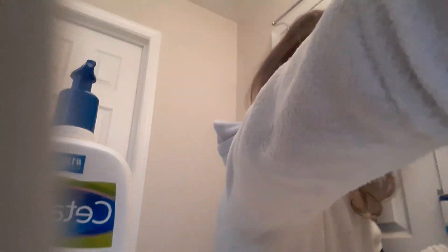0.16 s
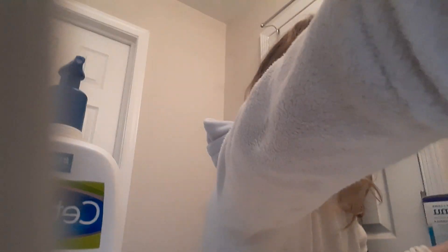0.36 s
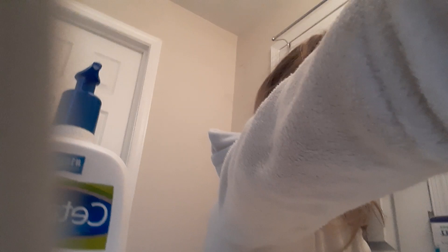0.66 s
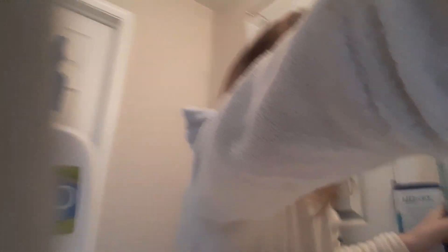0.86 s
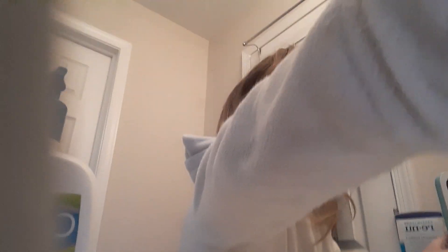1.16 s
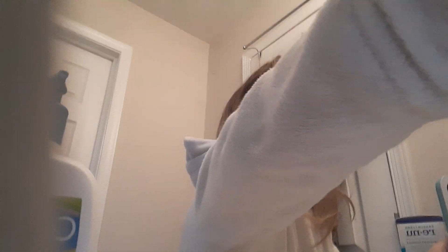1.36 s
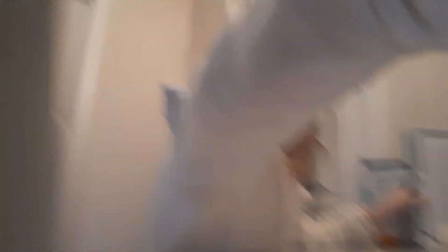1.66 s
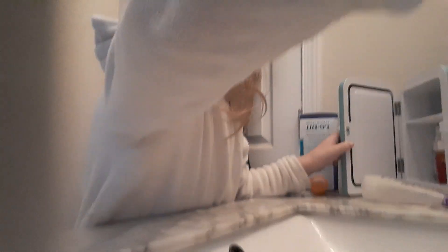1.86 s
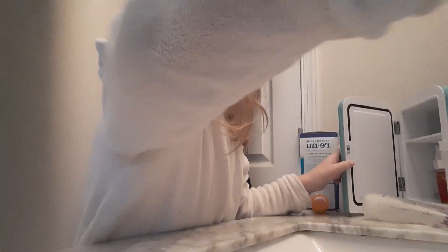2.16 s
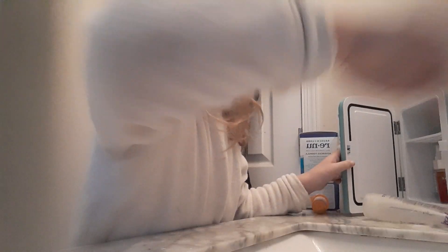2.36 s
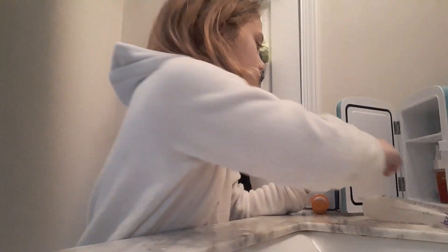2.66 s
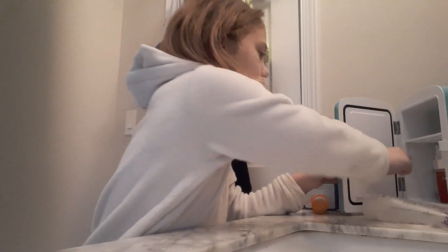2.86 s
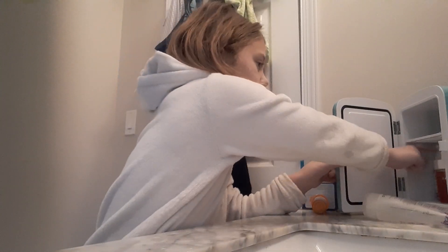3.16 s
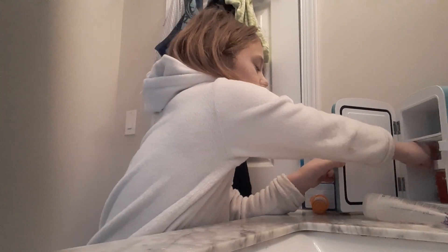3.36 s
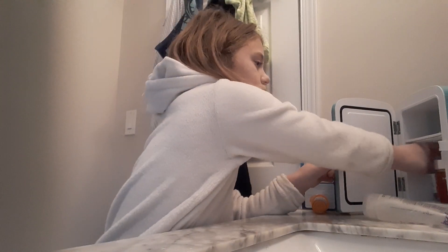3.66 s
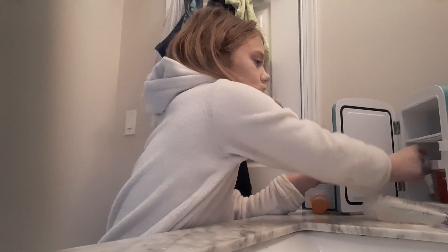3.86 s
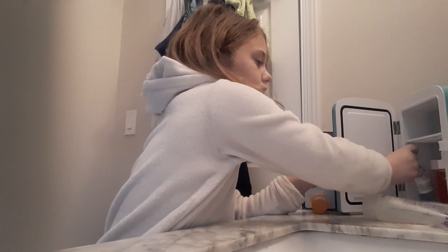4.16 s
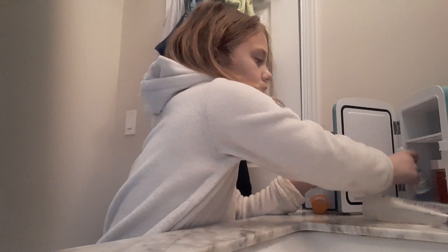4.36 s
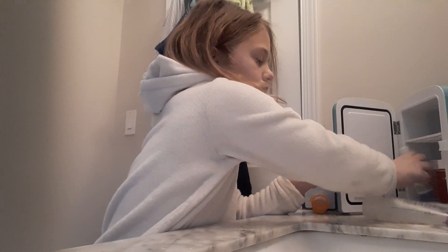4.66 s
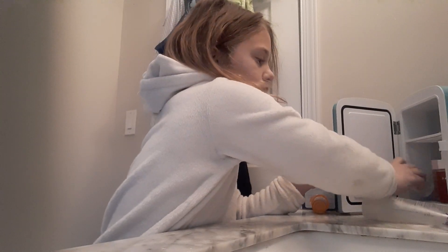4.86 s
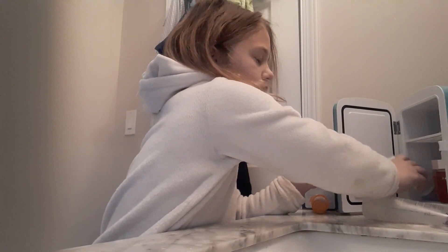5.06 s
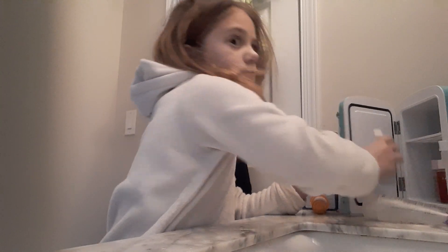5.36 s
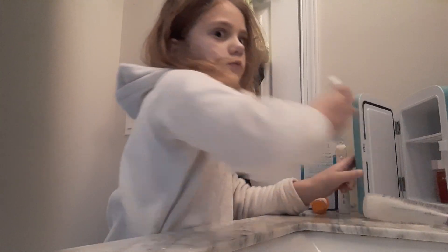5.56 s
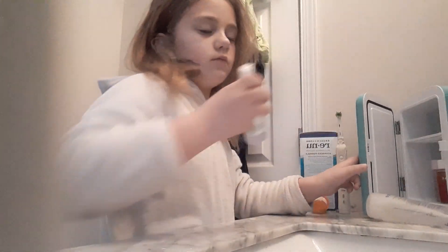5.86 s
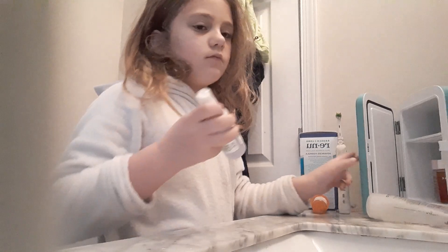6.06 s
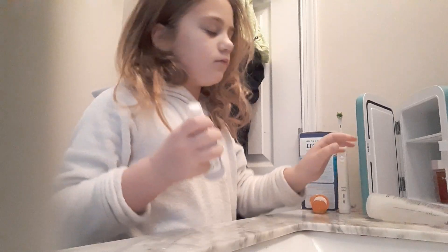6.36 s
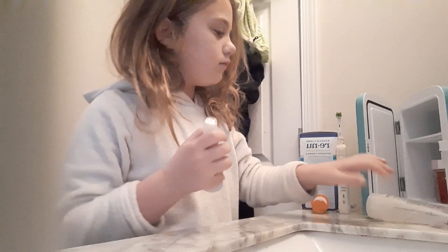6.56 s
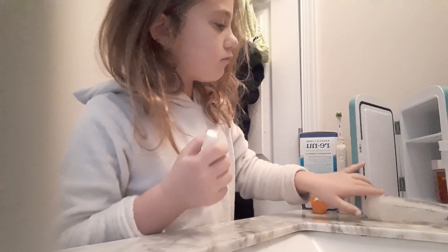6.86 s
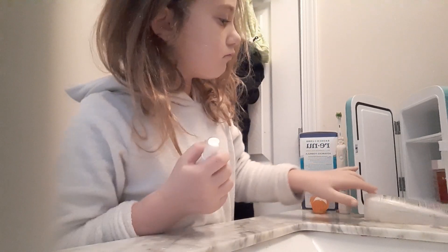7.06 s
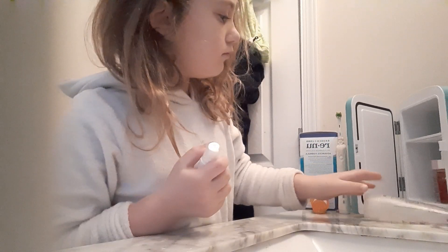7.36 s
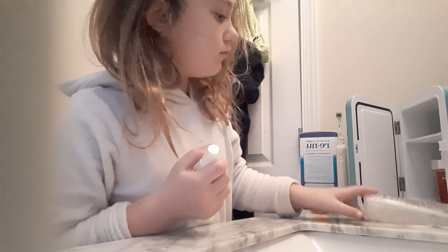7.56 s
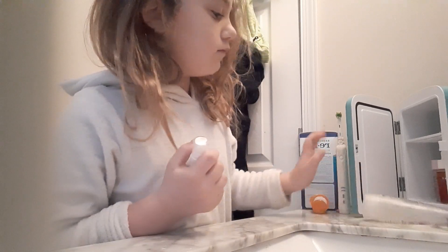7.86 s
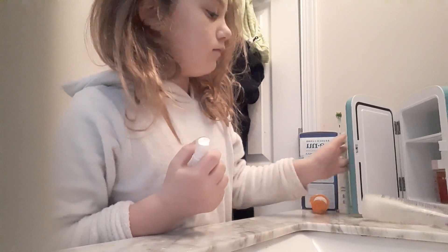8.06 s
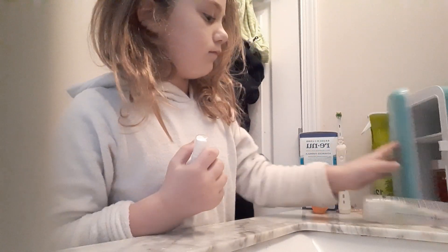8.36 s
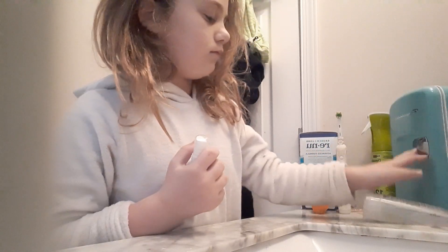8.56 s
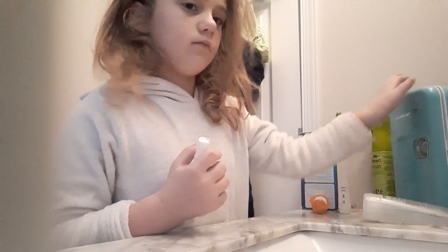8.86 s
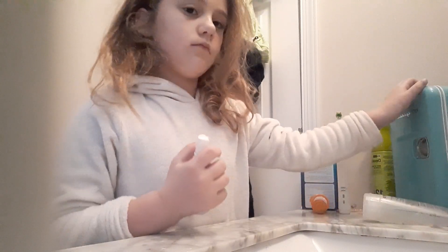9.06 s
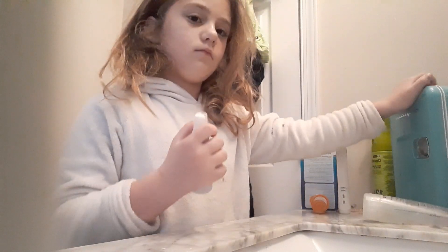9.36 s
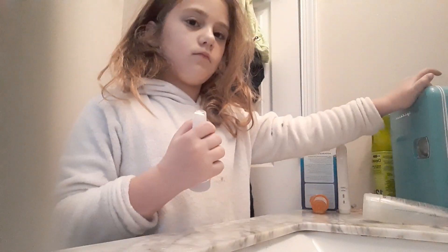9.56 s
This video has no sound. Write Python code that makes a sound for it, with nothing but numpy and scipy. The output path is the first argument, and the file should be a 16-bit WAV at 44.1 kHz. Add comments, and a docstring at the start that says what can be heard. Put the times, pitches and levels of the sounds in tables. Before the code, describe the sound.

Sharp handling knocks close by, then plastic bottles clatter in a small hollow fridge, its door thuds shut, and fingernails tick over a low fan hum.

```python
"""Bottles in a small fridge

In a small hard-walled bathroom a hand props up a tablet: dry ticks and thumps of filtered noise and modes.
Plastic bottles then knock and scrape inside a tiny hollow fridge and its door is pushed shut: impulses
and stick-slip forces excite damped modes. Nails tick and a palm slides on its outside.
A fan hums throughout as shaped noise and wavering tones; cloth and skin rustle as noise in the treble."""
import sys
import numpy as np
from scipy import signal
from scipy.fft import rfft, irfft, next_fast_len
from scipy.io import wavfile
from scipy.ndimage import uniform_filter1d

SR = 44100
rng = np.random.default_rng(int(sys.argv[2]) if len(sys.argv) > 2 else 0)


def level_to_linear(level):
    """Convert decibel levels to linear amplitude factors, elementwise."""
    exponent = np.asarray(level, float) / 20
    return 10 ** exponent


def unload_wav(signal):
    """Save mono or channel-first audio to the path in sys.argv[1] as 16-bit WAV at rate SR, clipped to [-1, 1]."""
    wavfile.write(
        sys.argv[1],
        SR,
        np.round(np.clip(np.atleast_2d(signal).T, -1, 1) * 32767).astype(np.int16),
    )


N = 428652
TIME = np.arange(N) / SR

# bottles and door striking the fridge:
# (first touch [s], strength [dB], note of the spot struck [Hz], relative upper modes [dB], relative clack [dB])
BLOWS = [(2.513, -45.5, 566, 1, -9), (3.045, -43, 299.4, -6.5, -10.5), (3.253, -38, 414, -12, -21),
         (3.291, -15, 462, -16.5, -18.5), (3.354, -30, 500, -2.5, -8), (3.374, -27, 287, -29, -6.5),
         (3.409, -19.5, 469, -43, -22), (3.52, -20, 404, -33, -20), (3.549, -45, 480, 3, -25.5),
         (3.647, -39, 405, -10.5, -15.5), (3.7805, -35.5, 298.4, 0.5, -38), (3.844, -44.5, 565, -3, -20),
         (3.879, -53, 323, 3, -18), (4.23, -39, 439, -4.5, -16), (4.379, -21.5, 257, -12, -29.5),
         (4.846, -21, 313, -11, -4), (4.897, -14.5, 280, -15.5, -12), (4.978, -29, 237, -24, -16),
         (5.435, -26.5, 457, 0.5, 0.5), (5.476, -18, 243, 5, -4), (5.494, -12, 426, -3, -9.5),
         (5.568, -10.5, 379, -8, -7), (5.707, -37.5, 375, -27.5, -10.5), (5.808, -43, 310, -31, -25),
         (5.988, -43.5, 303, -18, -16.5), (6.127, -49, 462, -3.5, -3.5), (6.174, -33, 312, -24.5, -24.5),
         (6.332, -39.5, 300, -32.5, -36), (6.49, -49.5, 328, -20, -27), (6.616, -38.5, 300, -25.5, -38),
         (6.863, -44.5, 303, -11, -28), (6.939, -15.5, 385, -16.5, -15), (7.138, -36, 381, -13, -21),
         (7.268, -43, 322, -21, -28), (7.43, -48, 328, -20.5, -20.5), (7.511, -31.5, 379, -13.5, -22.5),
         (7.752, -29, 382, -9.5, -15.5), (8.205, -26, 413, -1, -9), (8.216, -18, 388, -0.5, -8),
         (8.273, -27, 335, -24, -10), (8.309, -26.5, 364, -7, -28), (8.495, -19, 335, -12, -0.5),
         (8.544, -20, 288, -7, -5.5), (8.716, -35.5, 272, -13.5, -15.5), (8.951, -31.5, 269, -6.5, -6.5),
         (9.073, -43.5, 277, -1.5, -5.5), (9.254, -47.5, 280, 2.5, 6.5), (9.322, -52, 310, -16, -15),
         (9.332, -44, 288, -20, -4), (9.378, -36, 305, -2, 2), (9.44, -40.5, 306, -3, -4),
         (9.456, -43, 288, -3, -18), (9.521, -39, 280, -13.5, -18), (9.627, -37.5, 270, -8, -37),
         (9.702, -28, 263, -3.5, -15.5)]
# bottles dragged over the shelf, as relative forces:
# (start [s], length [s], drag [dB], chatter [dB], crunch [dB])
SCRAPES = [(3.29, 0.24, -40.5, -37.5, -38), (3.78, 0.096, -49, -45, -42.5), (4.2, 0.16, -48, -48.5, -51),
           (4.845, 0.1, -32.5, -35.5, -45), (5.437, 0.046, -22.5, -21, -20), (5.478, 0.049, -14, -23, -24),
           (5.568, 0.082, -23, -43, -49), (6.94, 0.12, -33.5, -36.5, -41), (8.205, 0.17, -32, -29, -46),
           (8.497, 0.13, -24.5, -41, -30), (8.95, 0.16, -42.5, -53, -43), (9.3, 0.24, -48.5, -56.5, -63)]
# modes of the fridge box and shelf: (frequency [Hz], relative level [dB])
BOX_MODES = [(218, 3.5), (242, -17.5), (285, -1.5), (340, 4), (400, -0.5), (436, -3), (478, 1.5), (572, 0),
             (640, -12), (704, 1.5), (770, -8), (845, -7), (970, -11.5)]
# modes of the stiff walls and bottle plastic: (frequency [Hz], relative level [dB])
PLASTIC_MODES = [(1125, 7.5), (1240, 6.5), (1370, 4.5), (1600, 0.5), (1830, 3.5), (2020, 2), (2250, -6),
                 (2480, -6.5), (2850, -9.5), (3100, -9.5), (3500, -20)]
# spectrum of the bright snap of a blow: (frequency [Hz], relative density [dB per Hz])
SNAP_SPECTRUM = [(2060, -47), (3500, -5.5), (4000, -8), (6400, -7), (7510, -13), (9380, 0.5), (11300, -7.5),
                 (14000, -4.5), (16000, -25.5)]
# extra bright snap of two sharp blows: (time [s], level [dB])
EXTRA_SNAPS = [(5.567, -28), (8.497, -39.5)]
# the whole fridge jolting on the counter: (first touch [s], impulse [dB])
JOLTS = [(4.892, -54), (5.473, -38), (5.569, -24), (6.94, -38), (7.752, -38), (8.215, -32), (8.498, -10.5),
         (8.544, -18), (8.954, -28)]
# fingernails ticking on the fridge top: (time [s], impulse [dB], note [Hz])
NAILS = [(8.498, -33, 2080), (8.545, -32, 2200), (9.08, -47.5, 1500), (9.255, -42.5, 2280),
         (9.333, -50.5, 2240), (9.457, -40, 2270), (9.701, -36, 2020)]
# fingers and stand on the tablet case:
# (first touch [s], strength [dB], relative thump [dB], relative body [dB], relative edge [dB])
TICKS = [(0.0024, -36.5, 9, -1, 1), (0.0131, -37, 3, 3, -3), (0.021, -30.5, 2.5, 10.5, -0.5),
         (0.031, -27.5, -1, -3.5, -9), (0.2955, -37, -30, -1, -9), (0.3366, -50, -11, -10, -18),
         (0.8688, -28, -3, -7.5, -2.5), (0.8759, -24, -17, -3.5, -15.5), (0.884, -40.5, 13.5, 6.5, -9),
         (0.9115, -32.5, -2, -6, -36), (1.287, -49.5, -14, 2.5, -4), (1.357, -51.5, -23, 8.5, -0.5),
         (1.3766, -31.5, -38, -9, -7.5), (1.409, -50, -4.5, 4.5, -8.5), (1.4425, -43, -23.5, 1, -23),
         (1.511, -50, -22.5, -6, -5.5), (1.5654, -48, -23, 10.5, -10), (1.655, -49.5, 7, 4.5, -4),
         (1.7054, -36, -16.5, -13, -12), (1.7212, -3.5, -1, -5, -2.5), (1.726, -25.5, -6.5, 1, -3),
         (1.7346, -25.5, -5, -0.5, 3.5), (1.7592, -3.5, -25.5, -7.5, 0), (1.7658, -16, -17, -12, -3.5),
         (1.847, -21.5, -36.5, -9.5, -16), (1.8594, -25.5, -14, -6.5, -15),
         (2.0834, -43.5, -24.5, 2, -12.5), (2.095, -45.5, -21.5, 13, 0)]
# spectrum of the bright edge of ticks and extra snaps: (frequency [Hz], relative density [dB per Hz])
EDGE_SPECTRUM = [(2940, -46), (5000, -19.5), (9240, 2), (10500, -10.5), (12800, -6.5), (14100, -12),
                 (15500, -7), (16500, -14)]
# a palm sliding over the smooth door: (start [s], length [s], level [dB])
PALM_STROKES = [(7.72, .44, -60.5)]
# spectrum of the palm's swish: (frequency [Hz], relative density [dB per Hz])
PALM_SPECTRUM = [(2060, -55.5), (3500, -20), (4780, -16.5), (5190, -9), (7560, -21), (8000, -11.5),
                 (11100, 2), (12500, -10), (15100, -2), (16000, -11)]
# cloth and skin rubbing, one row per stroke: (start [s], length [s], hiss [dB], rustle [dB], rub [dB])
RUSTLE_STROKES = [(-.1, 0.17, -53.5, -60, -58), (.12, 0.22, -68.5, -71.5, -64),
                  (.55, 0.34, -73, -78.5, -79), (.9, .25, -76.5, -88, -82), (1.15, 0.88, -70.5, -76.5, -79),
                  (3.0, 0.26, -73, -87, -88), (3.26, 0.25, -72, -74, -66), (3.6, 0.7, -83.5, -90.5, -78.5),
                  (4.82, 0.25, -70.5, -70, -63), (5.02, 0.25, -67, -75.5, -71),
                  (5.55, 0.45, -80.5, -95, -75.5), (6.75, 0.55, -82, -88.5, -74.5),
                  (7.4, 0.468, -83, -96, -82), (8.26, 0.25, -66.5, -65, -67), (8.5, 0.202, -69, -59, -60),
                  (8.92, 0.15, -72.5, -68.5, -69), (9.3, .24, -73.5, -70, -72)]
# spectrum of sliding cloth and skin: (frequency [Hz], relative density [dB per Hz])
HISS_SPECTRUM = [(2350, -55), (4000, -27), (4790, -22), (5190, -11.5), (7530, -13.5), (8600, -3.5),
                 (11000, -5), (12500, -6.5), (15200, -7.5), (16000, -10)]
# the background as it is heard, dipping and recovering: (time [s], hum level [dB], low rumble level [dB])
BACKGROUND_LEVEL = [(0.0, -54, -66), (0.43, -59, -82.5), (1.76, -58, -74.5), (1.92, -62, -79.5),
                    (2.3, -63, -102), (2.98, -63, -89.5), (3.44, -54.5, -91), (3.9, -57.5, -90.5),
                    (4.55, -58.5, -89), (6.63, -60.5, -100), (7.23, -58.5, -91), (8.74, -58.5, -73),
                    (9.72, -57.5, -68.5)]
# motor tones of the fan: (mean frequency [Hz], relative level [dB])
FAN_TONES = [(118.4, -85.5), (253.0, -74.5), (436.0, -78.5), (710.6, -77.5), (764.4, -72), (1163, -86),
             (1270, -78), (1453, -83.5), (1513, -92.5)]
# spectrum of air through the grille: (frequency [Hz], relative density [dB per Hz])
AIR_SPECTRUM = [(35, -68), (60, -36.5), (109, -2.5), (197, -13.5), (242, -8), (364, -8.5), (439, -3.5),
                (539, -9.5), (639, -6), (672, -21), (783, -7.5), (1010, -17.5), (1300, -19), (1600, -28),
                (3500, -45.5), (4550, -72.5), (7700, -120)]
# decay of the diffuse tail: (frequency [Hz], T60 [s])
ROOM_DECAY = [(100, 0.63), (300, 0.16), (800, .34), (2000, 0.28), (5000, 0.37), (12000, 0.091)]

CONTACT_S = 0.001  # from first touch to full contact
BOX_T60_S, PLASTIC_T60_S, NAIL_T60_S, TICK_T60_S = 0.17, 0.035, 0.02, 0.012
SNAP_DB = -21  # the bright snap of a blow, under its clack
BOX_SCATTER_DB, PLASTIC_SCATTER_DB = 4.3, 2.5  # chance in how a blow divides among the modes
GRAB_SHARE, SLIDE_FADE_DB = 0.17, -18  # a slide bites in this share of its length, then fades this far
GRIP_ENDS_S = 2.12  # the hand lets go of the tablet
STROKE_EDGE_SHARE, STROKE_EDGE_DB = 0.34, -14.5  # a stroke swells and dies over this share of its length
STILL_DB = -80.5, -95, -80  # constant floor of hiss, rustle and rub
SHAKE_DB, SHAKE_T60_S = -51.5, 0.8  # the counter rumbles on after each blow


def noise():
    """White noise: equal mean power at all frequencies."""
    return rng.standard_normal(N)


def unit(x):
    """Normalization to an rms of 1."""
    return x / np.sqrt(np.mean(x ** 2))


def colour(x, points):
    """Spectral shaping by (Hz, dB) points joined on a log-frequency axis, then normalized to rms 1."""
    size = next_fast_len(len(x))
    hz, db = np.transpose(points)
    bin_hz = np.arange(size // 2 + 1) * SR / size
    gain = level_to_linear(np.interp(np.log(bin_hz + 1), np.log(hz), db))
    return unit(irfft(rfft(x, size) * gain, size)[:len(x)])


def band(x, lo_hz, hi_hz):
    """Band-pass filtering: only components near and between the two edges survive."""
    return signal.sosfilt(signal.butter(2, [lo_hz, hi_hz], "band", fs=SR, output="sos"), x)


def walk(rate):
    """Slow random fluctuation of rms 1: held chance values, smoothed over one hold."""
    hold = int(SR / rate)
    steps = np.repeat(rng.standard_normal(N // hold + 1), hold)
    return unit(uniform_filter1d(steps, hold)[:N])


def ring(force, hz, t60):
    """Damped resonance: a unit impulse starts a sine of initial height 1 that decays exponentially."""
    r = np.exp(-np.log(1000) / (t60 * SR))
    w = 2 * np.pi * hz / SR
    return signal.lfilter([0, r * np.sin(w)], [1, -2 * r * np.cos(w), r * r], force)


def swell(force, hz, t60, rise_t60):
    """Modal build-up: a mode takes a moment to grow as the blow spreads through the walls."""
    return ring(force, hz, t60) - ring(force, hz, rise_t60)


def impulses(times, sizes):
    """Impulsive excitation: each blow is a force lasting one sample."""
    x = np.zeros(N)
    np.add.at(x, np.clip((times * SR).astype(int), 0, N - 1), sizes)
    return x


def bursts(times, db, t60):
    """Exponential decay: an envelope that jumps at each time and dies away."""
    out = np.zeros(N + SR)
    t = np.arange(SR // 5) / SR
    for s, d in zip(times, db):
        i = int(s * SR)
        out[i:i + len(t)] += level_to_linear(d - 60 * t / t60)
    return out[:N]


def strokes(rows, column, shares, shape_db):
    """Superposed stroke envelopes: each row passes through shape_db at these shares of its length."""
    shares, shape_db = np.array(shares), np.array(shape_db)
    return sum(level_to_linear(np.interp(TIME, row[0] + row[1] * shares, row[column] + shape_db, left=-200, right=-200))
               for row in rows)


def scrape_force(column):
    """Stick-slip friction: a dense, uneven rain of tiny blows while a bottle slides."""
    effort = strokes(SCRAPES, column, [0, GRAB_SHARE, 1], [-3, 0, SLIDE_FADE_DB])
    slips = rng.random(N) < 450 / SR  # 450 per second on average
    return effort * slips * rng.standard_normal(N)


def hollow(times, db, hz):
    """Local resonance: the short hollow note of the struck spot itself."""
    out = np.zeros(N + SR)
    t = np.arange(SR // 10) / SR
    for s, d, f in zip(times, db, hz):
        i = int(s * SR)
        envelope = level_to_linear(d - 60 * t / 0.046) * (1 - np.exp(-t / 0.00048))
        out[i:i + len(t)] -= envelope * np.sin(2 * np.pi * f * t)
    return out[:N]


def fridge():
    """Modal excitation: a blow drives the box modes near its spot most, and the stiff plastic by its clack."""
    s, db, spot_hz, upper_db, clack_db = np.transpose(BLOWS)
    s = s + CONTACT_S
    chance = rng.standard_normal((len(s), len(BOX_MODES) + len(PLASTIC_MODES)))
    drag, chatter, crunch = (scrape_force(column) for column in (2, 3, 4))
    out = hollow(s, db + 3, spot_hz)
    for k, (hz, mode_db) in enumerate(BOX_MODES):
        if hz > 600:
            reach_db = upper_db - 8
            slide = level_to_linear(-19) * chatter
        else:
            reach_db = -16 * np.abs(np.log2(hz / spot_hz)) - 16  # falls per octave from the spot's note
            slide = level_to_linear(-15) * drag
        force = impulses(s, level_to_linear(db + reach_db + BOX_SCATTER_DB * chance[:, k])) + slide
        sign = (-1) ** k  # neighbouring modes move in opposite phase
        out = out + sign * level_to_linear(mode_db) * swell(force, hz, BOX_T60_S, 0.00057)
    for k, (hz, mode_db) in enumerate(PLASTIC_MODES):
        scatter_db = PLASTIC_SCATTER_DB * chance[:, len(BOX_MODES) + k]
        force = impulses(s, level_to_linear(db + clack_db - 16 + scatter_db)) + level_to_linear(-30) * crunch
        out = out + (-1) ** k * level_to_linear(mode_db) * swell(force, hz, PLASTIC_T60_S, 0.0014)
    rattle = bursts(s, db + clack_db - 12, 0.04) * unit(band(noise(), 1500, 2660))
    snap = bursts(s, db + clack_db + SNAP_DB, 0.11) * colour(noise(), SNAP_SPECTRUM)
    # shelf and jars shake along
    loose = bursts(s, db + upper_db - 10, 0.087) * unit(band(noise(), 550, 1100))
    return out + rattle + snap + loose


def extra_snaps():
    """Broadband transient: bright decaying noise sharpens two of the blows."""
    s, db = np.transpose(EXTRA_SNAPS)
    return bursts(s, db, 0.045) * colour(noise(), EDGE_SPECTRUM)


def jolts():
    """Rigid-body resonance: the lowest mode of the fridge on its feet."""
    s, db = np.transpose(JOLTS)
    return swell(impulses(s + 0.0043, level_to_linear(db)), 139.3, 0.093, 0.0093)


def nails():
    """Impact resonance: each fingernail tick rings as one brief mode."""
    return sum(ring(impulses(np.array([s]), level_to_linear(db)), hz, NAIL_T60_S) for s, db, hz in NAILS)


def tablet():
    """Near contact: a touch gives a short crackle, a bright edge, a dull body and a slow modal thump."""
    s, db, thump_db, body_db, edge_db = np.transpose(TICKS)
    s = s + 0.94 * CONTACT_S
    crackle = bursts(s, db - 12, TICK_T60_S) * unit(band(noise(), 2200, 5000))
    edge = bursts(s, db + edge_db - 4.5, 1.2 * TICK_T60_S) * colour(noise(), EDGE_SPECTRUM)
    body = bursts(s, db + body_db - 4.5, 2.7 * TICK_T60_S) * unit(band(noise(), 130, 1000))
    push = impulses(s, level_to_linear(db + thump_db))
    thump = level_to_linear(-4.5) * ring(push, 150, 0.029) - swell(push, 52, 0.064, 0.04)
    return crackle + edge + body + thump


def grip():
    """Creep friction: skin on the case gives faint, sparse, bright specks while the hand holds it."""
    slips = rng.random(N) < 70 / SR  # 70 per second on average
    specks = slips * rng.exponential(size=N) * (TIME < GRIP_ENDS_S)
    envelope = signal.lfilter([1], [1, -0.97], specks)
    return level_to_linear(-64.5) * envelope * colour(noise(), HISS_SPECTRUM)


def palm():
    """Smooth sliding friction: a noise swish with its own bright bands."""
    envelope = strokes(PALM_STROKES, 2, [0, 0.45, 0.8, 1], [-13, 0, -1.5, -21])
    return envelope * colour(noise(), PALM_SPECTRUM)


def rustle():
    """Friction noise of fleece and fingertips: a bright hiss, a grainier rustle and a dull rub."""
    hiss = colour(noise(), HISS_SPECTRUM) * level_to_linear(1.2 * walk(33))
    grain = unit(band(noise(), 2700, 5200)) * level_to_linear(3.3 * walk(36))
    rub = unit(band(band(noise(), 1350, 2400), 1350, 2400)) * level_to_linear(1.8 * walk(25))
    shares = [0, STROKE_EDGE_SHARE, 1 - STROKE_EDGE_SHARE, 1]
    shape_db = [STROKE_EDGE_DB, 0, 0, STROKE_EDGE_DB]
    out = np.zeros(N)
    for k, layer in enumerate((hiss, grain, rub)):
        out += (level_to_linear(STILL_DB[k]) + strokes(RUSTLE_STROKES, k + 2, shares, shape_db)) * layer
    return out


def background():
    """Flow noise of the fan's grille, frequency-modulated motor tones and low rumble; the level dips at times."""
    s, hum_db, rumble_db = np.transpose(BACKGROUND_LEVEL)
    air = colour(noise(), AIR_SPECTRUM) * level_to_linear(1.2 * walk(3.3))
    tones = np.zeros(N)
    for hz, tone_db in FAN_TONES:
        level = level_to_linear(tone_db + 65.5 + 2.5 * walk(4))
        phase = 2 * np.pi * np.cumsum(hz * (1 + 0.0035 * walk(13))) / SR
        tones += level * np.sin(phase)
    rumble = level_to_linear(3.231 * walk(4.4)) * unit(band(noise(), 40, 85))
    blow_s, blow_db = np.transpose(BLOWS)[:2]
    decay = level_to_linear(-60 / SHAKE_T60_S / SR)  # per sample
    shake = signal.lfilter([1], [1, -decay], impulses(blow_s, level_to_linear(blow_db + SHAKE_DB)))
    rumble_level = level_to_linear(np.interp(TIME, s, rumble_db)) + shake
    return level_to_linear(np.interp(TIME, s, hum_db)) * (air + tones) + rumble_level * rumble


def room(x):
    """Diffuse reverberation of tiled walls: octaves die at their own rates; the thin door lets bass escape."""
    t = np.arange(int(SR / 2)) / SR
    hz, t60 = np.transpose(ROOM_DECAY)
    tail = np.zeros(len(t))
    for f in 110 * 2.0 ** np.arange(8):
        octave = band(rng.standard_normal(len(t)), f / np.sqrt(2), f * np.sqrt(2))
        bass_db = min(3 * np.log2(f / 1500), 0)
        octave_t60 = np.interp(np.log(f), np.log(hz), t60)
        tail += octave * level_to_linear(bass_db - 60 * t / octave_t60)
    tail = tail * np.clip(t / 0.0042, 0, 1)  # the first reflections take a few ms to arrive
    return signal.fftconvolve(x, tail / np.sqrt(np.sum(tail ** 2)))[:N]


def scene():
    """Direct and reverberant sound: the far fridge, too small to radiate deep bass, is wetter than the case."""
    bass_cut = signal.butter(2, 110, "high", fs=SR, output="sos")
    box = signal.sosfilt(bass_cut, fridge() + jolts())
    case = tablet() + grip()
    bright = nails() + extra_snaps()
    tail = room(level_to_linear(-1) * box + level_to_linear(-18) * case + level_to_linear(-6.5) * bright)
    mix = box + case + bright + tail + background() + rustle() + palm()
    return mix[None]


def low_pass(x):
    """Removes everything above the highest recorded frequency."""
    return signal.sosfilt(signal.butter(12, 17060, fs=SR, output="sos"), x)


def record(dry):
    """Microphone response: the deepest bass is lost and peaks clip at full scale."""
    bass_cut = signal.butter(1, 35, "high", fs=SR, output="sos")
    mix = np.clip(signal.sosfilt(bass_cut, dry), -1, 1)
    return low_pass(mix)


dry = scene()
out = record(dry)
unload_wav(out)
```